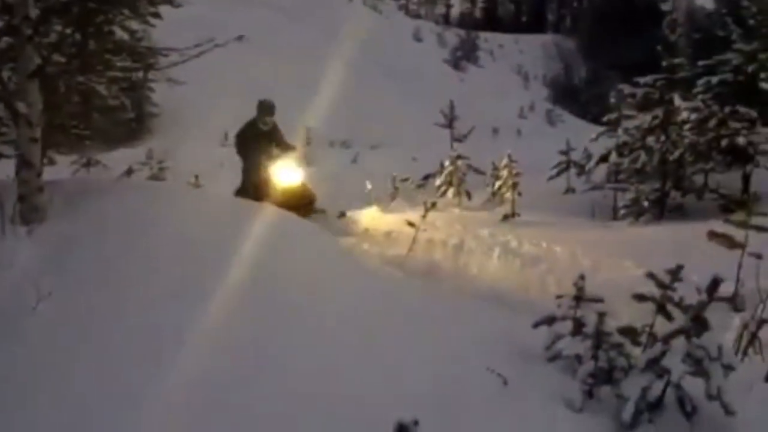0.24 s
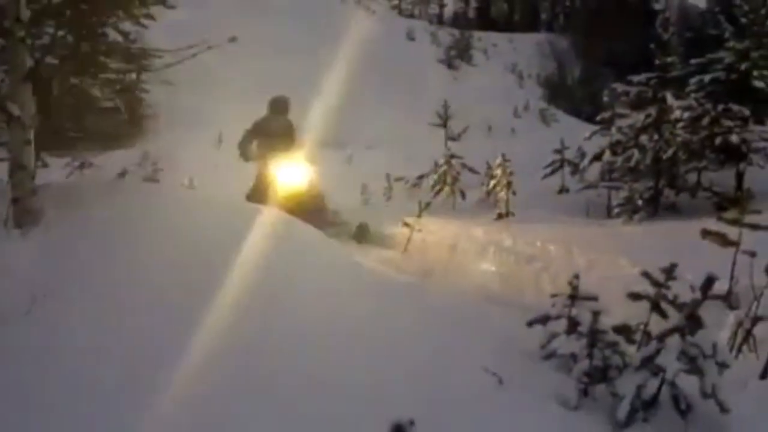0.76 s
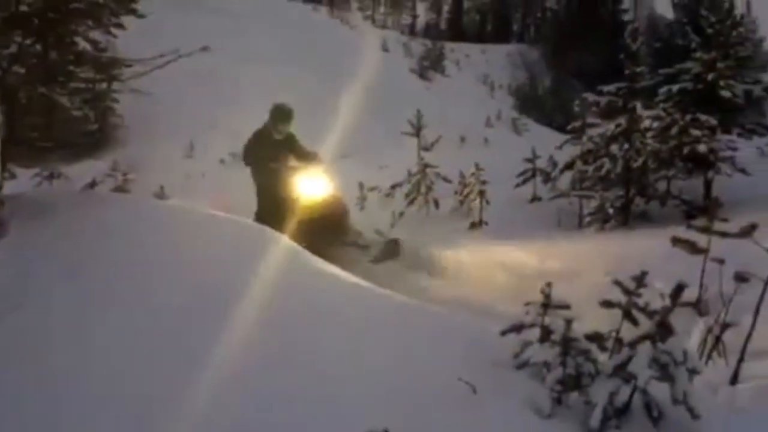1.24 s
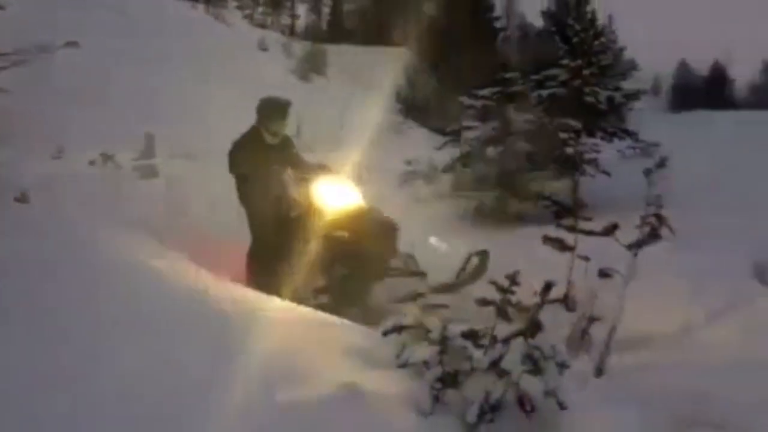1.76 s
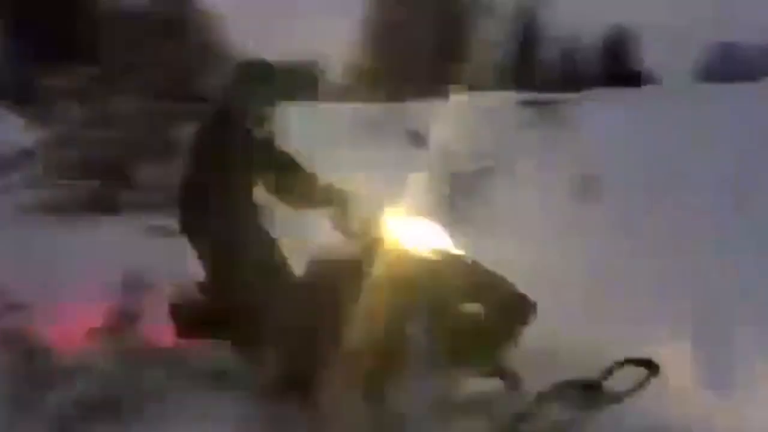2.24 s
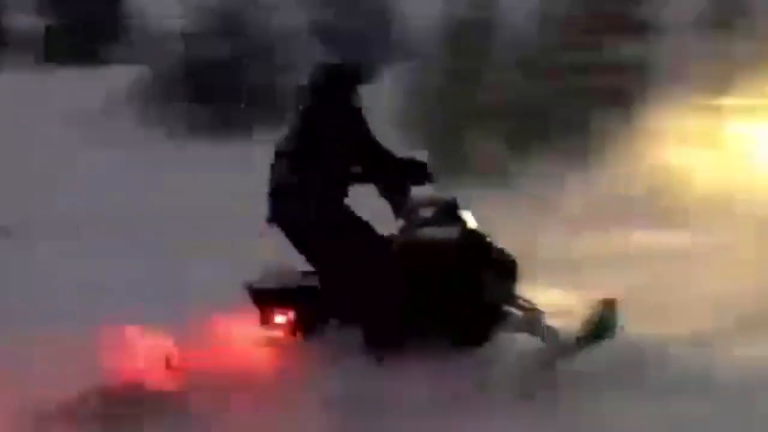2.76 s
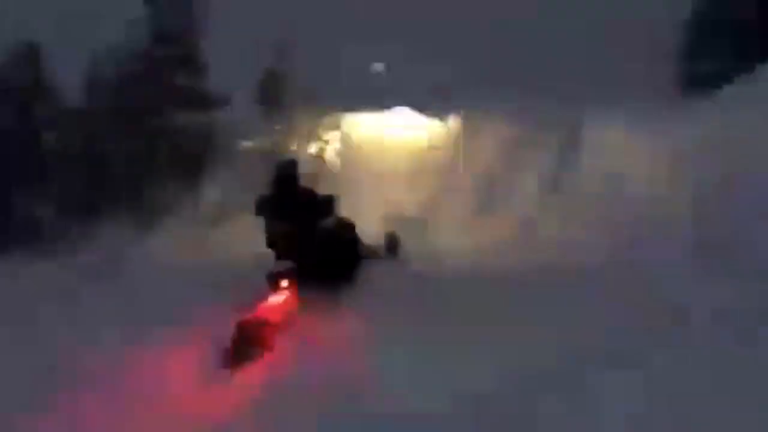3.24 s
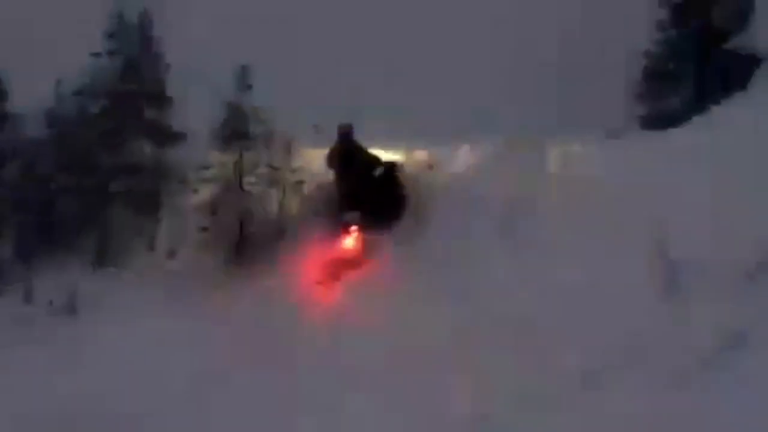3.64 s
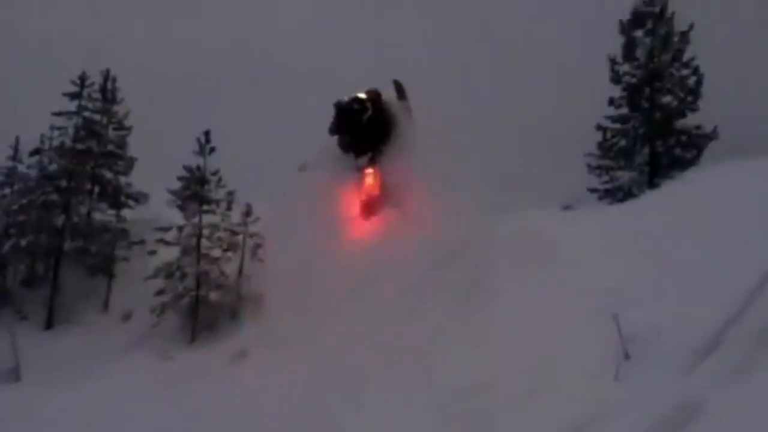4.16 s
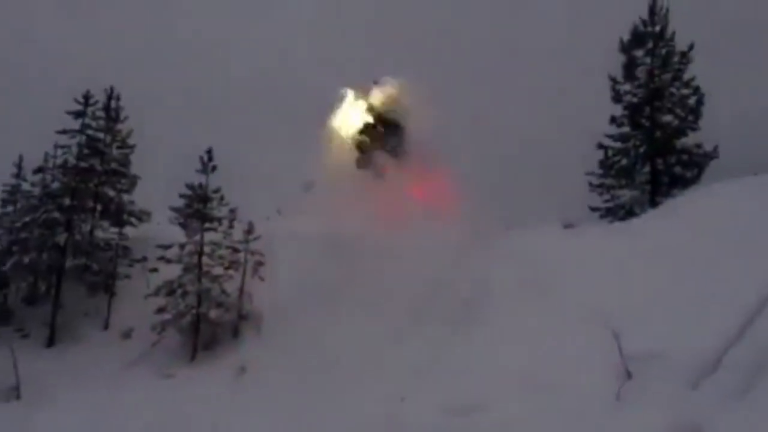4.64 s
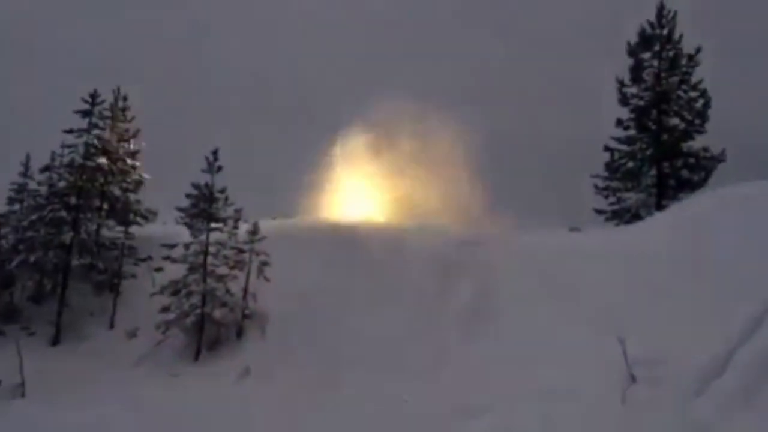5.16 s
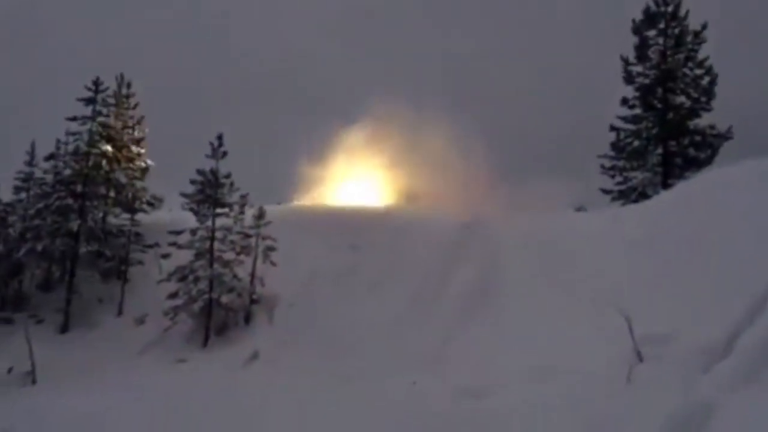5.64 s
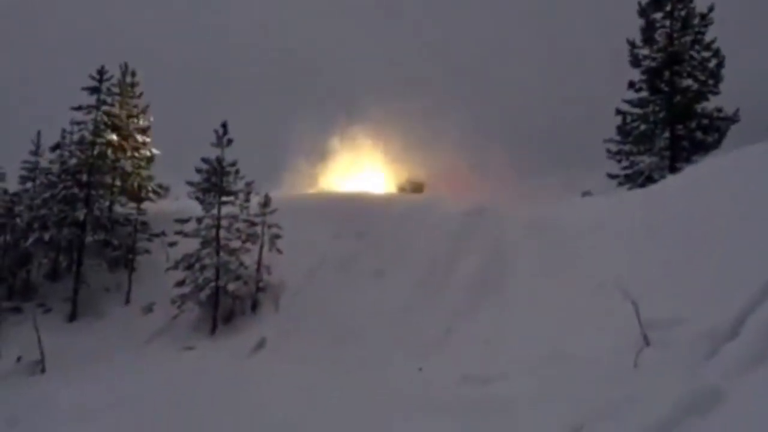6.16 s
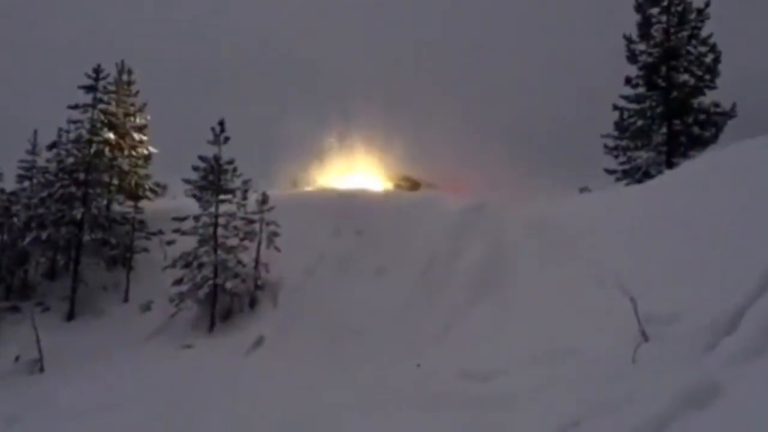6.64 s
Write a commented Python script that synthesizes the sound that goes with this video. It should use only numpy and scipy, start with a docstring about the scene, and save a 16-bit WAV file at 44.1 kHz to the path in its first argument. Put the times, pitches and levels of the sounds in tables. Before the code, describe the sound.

A two-stroke snowmobile hums closer through snowy woods, revs into a raspy roar, passes within metres, climbs away, then coasts with sputtering cracks.

```python
"""A two-stroke snowmobile cruises closer through snowy woods, opens up, passes a few metres away and climbs a hill.
Its exhaust is a boom of nearly pure low orders of the firing rate, under sharp pulses that ring in the silencer.
Firing-locked noise makes the clatter of the track and the hiss of thrown snow; a spinning track drums low tones.
Behind the crest the throttle all but shuts and the engine coasts, sputtering with short noisy cracks.
The draught, lumpy low noise, buffets the microphone as the machine draws level; far trees return weak echoes."""
import sys
import numpy as np
from scipy import signal
from scipy.fft import rfft, irfft
from scipy.io import wavfile
from scipy.ndimage import uniform_filter1d

SR = 44100
rng = np.random.default_rng(int(sys.argv[2]) if len(sys.argv) > 2 else 0)


def int16_out(signal):
    """Quantize to a 16-bit WAV file."""
    q = np.round(np.clip(np.atleast_2d(signal).T, -1, 1) * 32767)
    wavfile.write(sys.argv[1], SR, q.astype(np.int16))


N = 304290
TIME = np.arange(N) / SR

# the track spins up and its lugs drum on the snow:
# (time [s], length [s], lugs at first [1/s], lugs at last [1/s], peak level [dB])
SPINS = [(1.15, .42, 108, 215, -34.5), (3.028, 0.24, 226, 175, -40), (3.752, 0.59, 158, 250, -36),
         (4.478, 0.17, 266, 333, -24.5), (4.876, 0.39, 208, 236, -34.5)]


def boom(turns):
    """The low exhaust orders are nearly pure; unequal cylinders add faint tones half way between them."""
    # each order swells and fades on its own: (time [s], level [dB])
    first_order = [(0.0, -30.5), (1.2, -21.5), (1.53, -23), (1.65, -35.5), (1.98, -22), (2.28, -31.0),
                   (2.37, -21.5), (2.67, -25.5), (2.7, -41.5), (3.27, -31), (3.63, -37.5), (4.08, -28.5),
                   (4.17, -22.5), (4.35, -29.5), (4.71, -27.0), (5.88, -41.5), (6.15, -34), (6.9, -45)]
    second_order = [(0.0, -49.5), (0.81, -43.5), (1.17, -31.5), (1.5, -36), (1.74, -24), (2.04, -43),
                    (2.58, -30.5), (2.7, -37.5), (2.88, -28.5), (3.12, -45.0), (3.6, -45.5), (3.99, -38),
                    (4.2, -44.5), (4.41, -37), (4.86, -39.5), (5.1, -28.5), (5.88, -43.0), (6.9, -45.0)]
    third_order = [(0.0, -46.5), (0.96, -40.5), (1.35, -18.5), (1.47, -30.5), (2.338, -39), (2.49, -24.5),
                   (2.7, -38), (2.79, -27), (3.3, -40.5), (3.39, -51.0), (3.84, -33.0), (4.2, -45),
                   (4.35, -32), (5.01, -32.5), (5.1, -46.5), (5.7, -43), (6.39, -56), (6.9, -46.5)]
    fourth_order = [(0.0, -48.5), (0.57, -48.0), (1.41, -30.0), (1.8, -30), (1.95, -19.0), (2.31, -33.0),
                    (2.85, -20.5), (3.451, -49), (3.54, -41.5), (3.96, -33), (4.05, -44.0), (4.11, -25.5),
                    (4.35, -31), (4.98, -20.0), (5.07, -26.0), (5.76, -26.5), (5.82, -43), (6.9, -45.5)]
    fifth_order = [(0.0, -51), (0.93, -47.5), (1.17, -26.5), (1.74, -30), (1.8, -41), (1.89, -24.5),
                   (2.34, -37.0), (2.52, -23), (2.85, -22.0), (3.45, -45.5), (3.75, -35.5), (4.26, -33.5),
                   (4.44, -44.0), (4.74, -26), (4.86, -42), (5.282, -23.5), (5.82, -40.5), (6.21, -36),
                   (6.33, -47.5), (6.9, -48)]
    # orders 0.5, 1.5, 2.5 and 3.5: (mean level against order 1 [dB])
    half_orders = [-23.5, -39, -25.5, -23.5]
    orders = (first_order, second_order, third_order, fourth_order, fifth_order)
    levels = [in_time(order)[0] for order in orders]
    whole = 0
    for k, db in enumerate(levels, 1):
        pipe_lag = k * (k - 1) * np.pi / 8  # the pipe delays higher orders more
        whole = whole + from_db(db) * np.cos(2 * np.pi * k * turns - pipe_lag)
    halves = 0
    for k, db in enumerate(half_orders):
        gain = from_db(levels[0] + db + 2 * drift(4.7))
        halves = halves + gain * np.sin(2 * np.pi * (k + .5) * turns)
    return np.sqrt(2) * (whole + halves) * strength(turns, uneven_db=0.78, twin_db=0)


def edge(turns):
    """Exhaust pulses ring in the silencer; the more throttle, the more bark, bite and rasp."""
    # silencer and hood: (frequency [Hz], level [dB])
    silencer = [(600, -24), (1400, 4), (1650, -2), (2000, 5.5), (2500, 0), (2830, -8.5), (3080, -12.5),
                (3400, -9.5), (4100, -14.5), (4850, -24), (5400, -18.5), (7000, -20), (8000, -23.5)]
    # level laws: (far off [dB], full throttle adds [dB], abreast adds [dB], going away adds [dB], lull adds [dB])
    bark_law = (-41, 20, -4.5, -1, 1.5)
    bite_law = (-49.5, 22.5, 5, 2, -5)
    rasp_law = (-59.5, 31.5, 0.5, -2.5, -10)
    # the same for the very top, against the rasp
    beam_law = (-1, .5, -11.5, 0, -6)
    # the midrange flares or sags: (time [s], length [s], added to the bark [dB], added to the bite [dB])
    flares = [(1.332, 0.33, 3, 4), (1.85, 0.58, -4, -5.5), (2.314, 0.12, 6.5, 2), (2.882, 0.7, -7.5, -2),
              (3.884, 0.09, -3, 8), (4.03, .22, 2.5, 5.5), (5.14, 0.18, -4, 6.5), (5.282, .11, 8.5, -1.5),
              (5.383, .13, -8, -4)]
    bark_top_hz, bite_top_hz, rasp_top_hz = 2112, 3074, 4530

    bark_db, bite_db, rasp_db, beam_db = map(level_db, (bark_law, bite_law, rasp_law, beam_law))
    for s, length, more_bark_db, more_bite_db in flares:
        bark_db = bark_db + more_bark_db * arch(s, length)
        bite_db = bite_db + more_bite_db * arch(s, length)

    # ragged firings vary in moment and in force
    rough = roughness()
    late = .013 * rough ** 2 * drift(300)
    blows = pulses(turns - late, order=6) * strength(turns, uneven_db=2.0, twin_db=1.5) ** rough
    rung = chambers(colour(blows, silencer))
    pipe = off_the_snow(rung, lag_s=.0009 + .00008 * drift(9))

    bark = from_db(bark_db) * levelled(band(pipe, 910, bark_top_hz))
    bite = from_db(bite_db) * levelled(band(pipe, bark_top_hz, bite_top_hz))
    beam = from_db(beam_db) * levelled(band(pipe, rasp_top_hz, 10000))
    rasp = from_db(rasp_db) * (levelled(band(pipe, bite_top_hz, rasp_top_hz)) + beam)
    return bark * swell() + bite * swell() + rasp * swell()


def sputter():
    """Starved of fuel, the engine catches for a few firings at a time: each a crack with a short puff of gas."""
    # runs of stray firings, before ringing and gain: (time [s], length [s], mean level [dB])
    runs = [(5.773, .010, -15.5), (5.799, .014, -14), (5.836, .006, -15), (5.868, .014, -13),
            (5.907, .018, -15.5), (5.949, .003, -17), (5.973, .011, -18.5), (6.004, .007, -18),
            (6.126, .016, -12), (6.163, .011, -11.5), (6.195, .016, -11.5), (6.279, .0055, -11.5)]
    # lone firings between two runs: (from [s], to [s], firings [1/s], mean level before ringing and gain [dB])
    stumble = (6, 6.11, 110, -15)
    # ring of a stray firing: (frequency [Hz], level [dB])
    stray_ring = [(200, -6.5), (450, -7), (700, -9.5), (1150, 4.5), (1450, 0.5), (1750, -10), (2200, -13.5),
                  (2800, -5.5), (3150, -20), (4100, -19), (4850, -35), (6000, -29.5), (8000, -32.5)]
    speed = engine_speed()
    cracks = np.zeros(N)
    start, end, rate, lone_db = stumble
    lone = [(s + rng.uniform(0, .5) / rate, 1 / SR, lone_db) for s in np.arange(start, end, 1 / rate)]
    for s, length, db in runs + lone:
        firings = np.arange(s, s + length, 1 / speed[int(s * SR)])
        cracks[(firings * SR).astype(int)] = from_db(db + rng.normal(0, 1, len(firings)))
    # the gas dies away with a time constant of 2 ms
    gas = signal.lfilter([.17], [1, -np.exp(-1 / (.002 * SR))], cracks + 1e-18)
    puff = gas * rng.standard_normal(N)
    return from_db(20.0) * chambers(colour(cracks + puff, stray_ring))


def crank(hunt, jitter):
    """Firings counted so far: the speed hunts slightly and each firing comes a little early or late."""
    return np.cumsum(engine_speed() * (1 + hunt * drift(25))) / SR + jitter * drift(220)


def engine_speed():
    """Firings per second: driven by the throttle, then dropping at once and sinking towards idle."""
    # engine speed under throttle, before it coasts: (time [s], firings [1/s])
    revs = [(0.0, 187.9), (0.3, 198.1), (0.83, 199.5), (0.91, 205.0), (1.09, 233.2), (1.22, 263.5),
            (1.27, 270.9), (1.43, 272.4), (1.54, 279.4), (1.73, 283.3), (2.07, 283.2), (2.12, 271.7),
            (2.21, 241.0), (2.31, 223.3), (2.44, 229.9), (2.62, 258.2), (2.68, 264.3), (2.77, 255.0),
            (2.9, 266.0), (3.06, 250.1), (3.17, 233.1), (3.34, 227.2), (3.45, 209.2), (3.48, 210.1),
            (3.62, 234.6), (3.8, 238.1), (4.06, 270.1), (4.12, 273.6), (4.27, 250.3), (4.41, 236.0),
            (4.46, 235.0), (4.72, 263.7), (5.0, 281.4), (5.08, 283.9), (5.26, 279.0), (5.36, 272.0),
            (5.57, 282.0), (5.76, 282.0)]
    coast_s, idle_hz = 5.76, 130
    drop_hz, drop_s, sink_s = 20, .05, 1.62  # the last two are time constants
    driven, = in_time(revs)
    since = np.maximum(TIME - coast_s, 0)
    dropped = driven - drop_hz * (1 - np.exp(-since / drop_s))
    return idle_hz + (dropped - idle_hz) * np.exp(-since / sink_s)


def throttle():
    """How far the throttle is open, 0-1."""
    # squeezes: (opens [s], opening time [s], lets go [s], closing time [s], depth [0-1])
    squeezes = [(.94, 0.39, 2.18, 0.084, 0.88), (2.16, 0.45, 3.1, 0.23, 0.95), (3.05, .05, 3.27, 0.11, 0.7),
                (3.52, 0.039, 3.67, 0.02, 0.42), (3.66, 0.24, 4.238, 0.23, 0.53),
                (4.4, 0.36, 5.765, 0.057, 0.75), (5.95, 0.065, 6.7, .02, 0.15)]
    return np.max([depth * gate(*timing) for *timing, depth in squeezes], axis=0)


def roughness():
    """Combustion is cleanest under load, more ragged on a shut throttle, a spinning track or falling revs."""
    rough_open, rough_shut, rough_spin = 0.18, .3, .12  # at full throttle; added when shut; added by a spin
    rough_per_hz_per_s = .0009  # added by falling revs
    falling = uniform_filter1d(np.maximum(-np.gradient(engine_speed()) * SR, 0), size=2000)
    load = rough_open + rough_shut * (1 - throttle())
    return np.clip(load + rough_per_hz_per_s * falling + rough_spin * spinning(), 0, .8)


def strength(turns, uneven_db, twin_db):
    """No two firings are alike, and one of the two cylinders is the stronger."""
    count = np.arange(4096)
    firing_db = uneven_db * rng.standard_normal(len(count)) + twin_db * (-1) ** count
    return from_db(np.interp(turns, count, firing_db))


def pulses(turns, order):
    """One sharp pulse a firing, from the given order up; shifting ground reflections make orders swell and fade."""
    step = np.exp(2j * np.pi * turns)
    wave, out = step ** order, 0
    for k in range(order, 38):
        out = out + from_db((2.2 + .08 * k) * drift(9 + k / 3)) * wave.real
        wave = wave * step
    return rms_one(out)


def chambers(x):
    """Each pulse bounces to and fro in the silencer's chambers and leaves as a short string of peaks."""
    for trip_s, back in [(.00085, .3), (.00036, .35)]:
        loop = np.zeros(round(trip_s * SR) + 1)
        loop[[0, -1]] = 1, -back
        x = signal.lfilter(loop[::-1], loop, x)  # all-pass
    return x


def off_the_snow(x, lag_s):
    """A reflection from the snow crust combs the sound; the comb slides as the machine rides the bumps."""
    return (x - .5 * np.interp(TIME - lag_s, TIME, x)) / np.hypot(1, .5)


def swell():
    """Each register swells and sags as the machine rocks on the snow."""
    return from_db(1.2 * drift(17))


def level_db(law):
    """A layer's level follows the throttle and where the machine is on its way past the microphone."""
    # after the pass the treble dulls for a while: (starts [s], onset [s], ends [s], recovery [s])
    lull = (3.28, 0.11, 3.72, 0.17)
    pass_s, nearest_m, speed_m_per_s = 3.03, 2.83, 6.7
    far_db, throttle_db, abreast_db, away_db, lull_db = law
    along = speed_m_per_s * (TIME - pass_s)
    distance = np.hypot(nearest_m, along)
    place_db = abreast_db * nearest_m / distance + away_db * (1 + along / distance) / 2
    return far_db + throttle_db * throttle() + place_db + lull_db * gate(*lull)


def running_gear(turns):
    """Track links clatter in the tunnel, which sounds different from front and rear; snow and gas hiss."""
    # noise spectra, relative: (frequency [Hz], density [dB per Hz])
    rumble_spectrum = [(60, -12), (130, -11.5), (250, 7), (380, -13), (600, -9), (900, -10.5)]
    front_spectrum = [(350, -16), (600, -13), (1000, -6.5), (1270, -0.5), (1500, -6.5), (1830, 5.5),
                      (2100, -5.5), (2450, -4.5), (2900, -13.5), (3600, -19)]
    rear_spectrum = [(350, -29.5), (650, -3), (950, -6), (1250, -0.5), (1550, -7.5), (1850, -1.5),
                     (2250, -2.5), (2700, -6.5), (3000, -15.5), (3600, -21.5)]
    hiss_spectrum = [(2200, -20), (3100, -3), (3600, -3), (4300, -3), (4850, -11), (5600, 1), (6400, 2),
                     (7300, 0), (8000, -8)]
    # level laws: (far off [dB], full throttle adds [dB], abreast adds [dB], going away adds [dB], lull adds [dB])
    rumble_law = (-44, -4, -1.5, 7, -5.5)
    track_law = (-34.5, 5, -2, -2.5, -7.5)
    hiss_law = (-54.5, 10.5, -4, -2, -16)
    # the track throws up snow: (time [s], length [s], added to the hiss [dB])
    sprays = [(1.12, 0.12, 11), (1.26, 0.52, 8), (1.594, 0.43, 16.5), (2.542, 0.61, 5), (3.992, 0.31, 14),
              (4.68, .7, 7)]
    rumble_db, track_db, hiss_db = map(level_db, (rumble_law, track_law, hiss_law))
    hiss_db = hiss_db + sum(db * arch(s, length) for s, length, db in sprays)
    track_db = track_db + 2 * spinning()  # a spinning track clatters louder

    links = puffs(turns, depth=.45) * from_db(2.4 * drift(330))
    spray = puffs(turns, depth=.45) * from_db(1.3 * drift(50))
    behind = np.clip(TIME - 3.55 + .5, 0, 1)  # one second from front to rear, half way at 3.55 s
    front = np.sqrt(1 - behind) * rms_one(colour(links, front_spectrum))
    rear = np.sqrt(behind) * rms_one(colour(links, rear_spectrum))
    rumble = from_db(rumble_db) * noise(rumble_spectrum)
    clatter = from_db(track_db) * (front + rear)
    hiss = from_db(hiss_db) * rms_one(colour(spray, hiss_spectrum)) * swell()
    return rumble + clatter + hiss


def puffs(turns, depth):
    """Noise that surges with each firing."""
    return rms_one(rng.standard_normal(N) * np.exp(depth * np.cos(2 * np.pi * turns)))


def lugs():
    """Whenever the track spins, its lugs drum a wavering low tone that glides with its speed."""
    waver, out = 1 + .02 * drift(40), 0
    for s, length, first_hz, last_hz, db in SPINS:
        beats = np.cumsum(np.interp(TIME, [s, s + length], [first_hz, last_hz]) * waver) / SR
        tone = np.sin(2 * np.pi * beats) + from_db(-20.0) * np.sin(4 * np.pi * beats)
        out = out + from_db(db) * arch(s, length) * tone
    return np.sqrt(2) * from_db(2 * drift(30)) * out


def spinning():
    """How much the track slips, 0-1."""
    return sum(arch(s, length) for s, length, *_ in SPINS)


def draught():
    """Light lumpy air on the microphone, and buffets as the machine draws level."""
    # relative spectrum of the air: (frequency [Hz], density [dB per Hz])
    wind_spectrum = [(20, -16), (50, -4), (110, 0), (190, -2), (270, -9), (390, -5), (600, -13),
                     (1200, -32)]
    # level law: (far off [dB], full throttle adds [dB], abreast adds [dB], going away adds [dB], lull adds [dB])
    draught_law = (-38, -6.5, -9.5, -1, -1)
    # gusts on top of the light air: (time [s], length [s], peak level before the lumps [dB])
    buffets = [(1.18, 0.13, -43), (2.655, 0.12, -23.5), (2.758, .16, -25.5), (2.89, 0.17, -29.5)]
    gain = from_db(level_db(draught_law))
    gain = gain + sum(from_db(db) * arch(s, length) for s, length, db in buffets)
    lumps = from_db(1.8 * drift(60))
    return gain * lumps * noise(wind_spectrum)


def woods(x):
    """Far trees return a few weak echoes, dulled by snow."""
    # echoes: (delay [s], level [dB])
    echoes = [(0.046, -13), (0.081, -33.5), (0.132, -23.5), (0.198, -24)]
    dull = signal.sosfilt(signal.butter(2, 2500, fs=SR, output="sos"), x)
    return x + sum(from_db(db) * np.interp(TIME - s, TIME, dull, left=0) for s, db in echoes)


def from_db(db):
    """Decibels to gain."""
    return 10 ** (np.asarray(db) / 20)


def rms_one(x):
    """Scale to unit power."""
    return x / np.sqrt(np.mean(x ** 2) + 1e-20)


def in_time(rows):
    """Each column of a curve table at every sample."""
    s, *columns = np.transpose(rows)
    return [np.interp(TIME, s, c) for c in columns]


def gate(start, attack, end, release):
    """Rises from 0 to 1, holds and falls back."""
    return np.clip(np.minimum((TIME - start) / attack, 1 - (TIME - end) / release), 0, 1)


def arch(start, length):
    """One smooth swell from 0 to 1 and back."""
    return np.sin(np.pi * np.clip((TIME - start) / length, 0, 1))


def drift(rate):
    """Smooth chance of unit power that changes about rate times a second."""
    knots = rng.standard_normal(8192)
    return rms_one(np.interp(TIME * rate, np.arange(len(knots)), knots))


def colour(x, spectrum):
    """Causal (minimum-phase) filter with the given spectrum, so that pulses ring after they strike."""
    size = 4096
    hz, db = np.transpose(spectrum)
    grid = np.maximum(np.fft.rfftfreq(size, 1 / SR), 1)
    gain = from_db(np.interp(np.log(grid), np.log(hz), db))
    # beyond the table's ends the gain falls by 12 dB an octave
    beyond = np.abs(np.log(grid / np.clip(grid, hz[0], hz[-1])))
    cepstrum = irfft(np.log(gain) - 2 * beyond)
    # folding the cepstrum forward gives minimum phase
    cepstrum[1:size // 2] *= 2
    cepstrum[size // 2 + 1:] = 0
    return signal.oaconvolve(x, irfft(np.exp(rfft(cepstrum))))[:N]


def band(x, low_hz, high_hz):
    """Steep band-pass."""
    return signal.sosfiltfilt(signal.butter(5, [low_hz, high_hz], "band", fs=SR, output="sos"), x)


def levelled(x):
    """Unit power over every few hundredths of a second."""
    size = SR // 40
    power = uniform_filter1d(uniform_filter1d(x * x, size), size)
    return x / np.sqrt(np.abs(power) + 1e-12)


def noise(spectrum):
    """Coloured noise of unit power."""
    return rms_one(colour(rng.standard_normal(N), spectrum))


def scene():
    """Engine and running gear among the woods, with the draught on the microphone."""
    turns = crank(hunt=.0005, jitter=.0008)
    engine = boom(turns) + edge(turns) + sputter()
    chassis = running_gear(turns) + lugs()
    return (woods(engine + chassis) + draught())[None]


def record(dry):
    """The level dips briefly once, the tallest peaks are rounded and the top is cut."""
    dip_s, half_width_s, ceiling, cutoff_hz = 3.32, .013, .6, 7850
    x = dry * np.clip(np.abs(TIME - dip_s) / half_width_s, .05, 1)
    rounded = x / (1 + (x / ceiling) ** 6) ** (1 / 6)
    return signal.sosfilt(signal.ellip(10, .3, 80, cutoff_hz, fs=SR, output="sos"), rounded)


dry = scene()
out = record(dry)
int16_out(out)
```